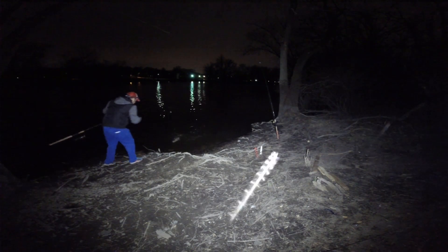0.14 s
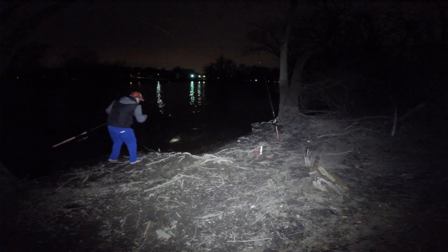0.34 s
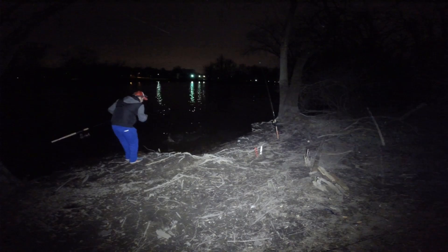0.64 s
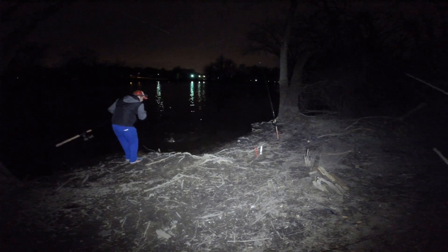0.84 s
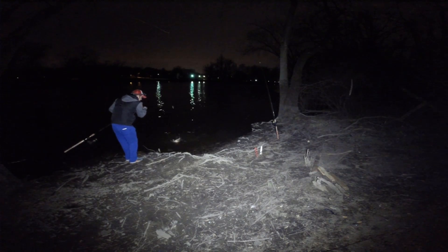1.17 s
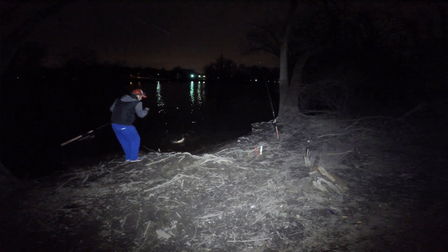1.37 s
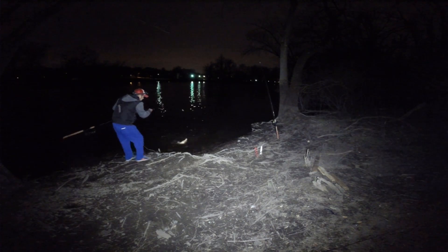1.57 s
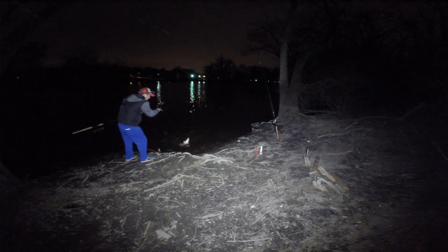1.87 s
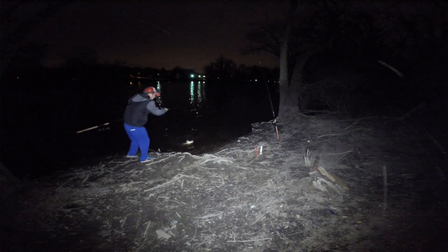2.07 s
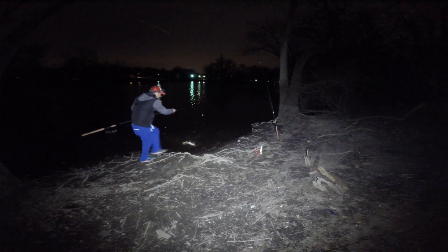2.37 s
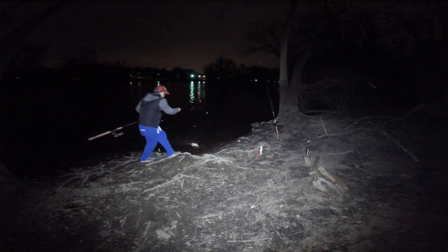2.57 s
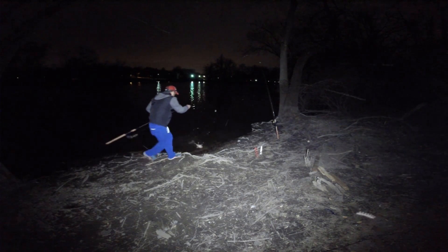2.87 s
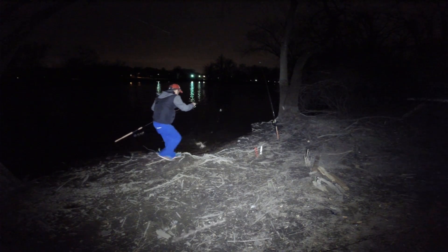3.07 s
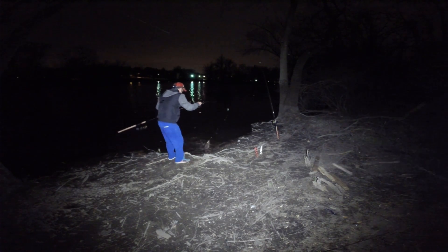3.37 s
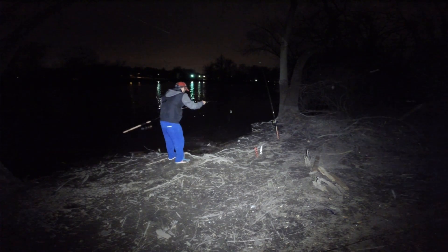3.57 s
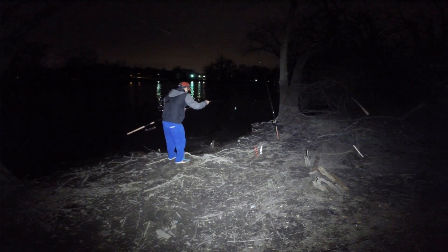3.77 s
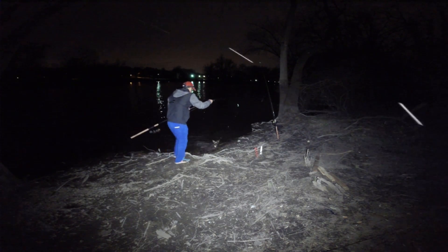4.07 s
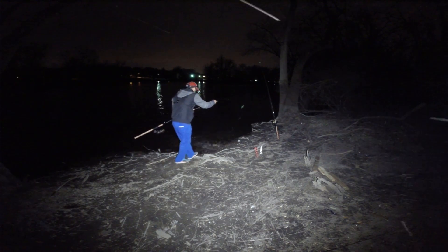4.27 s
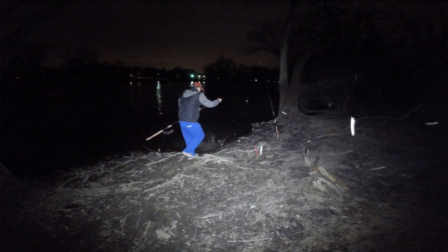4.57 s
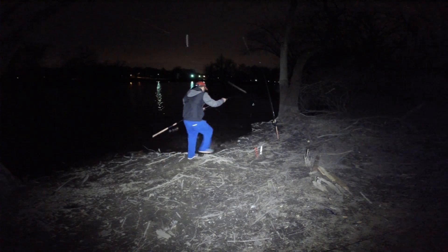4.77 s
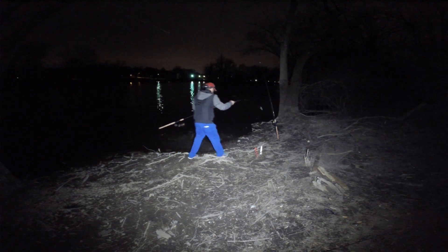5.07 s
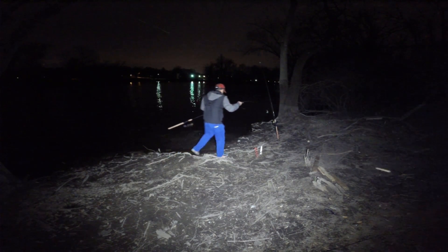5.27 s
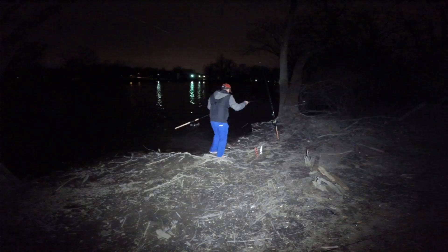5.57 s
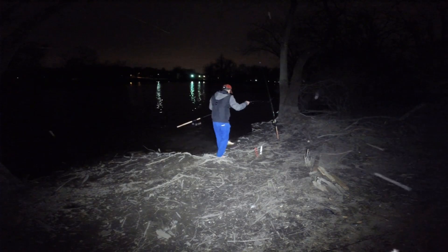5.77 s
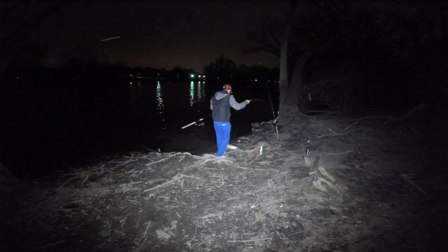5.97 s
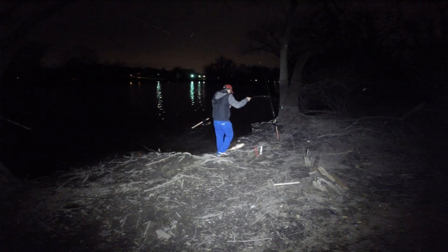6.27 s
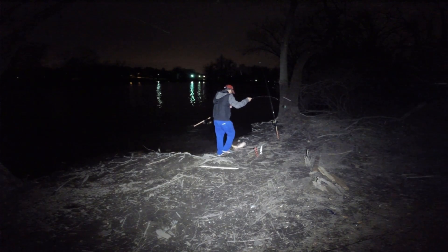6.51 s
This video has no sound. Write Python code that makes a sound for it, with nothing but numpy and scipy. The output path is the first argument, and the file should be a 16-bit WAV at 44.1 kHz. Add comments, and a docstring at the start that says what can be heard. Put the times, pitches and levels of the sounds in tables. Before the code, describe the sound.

Slow steps over dry brush at night, twigs snapping and sticks knocking while small metal tackle jingles over a faint distant drone.

```python
"""A river bank at night: a steady distant drone, soft hiss, faint hum and a thin pulsing electronic whine.
Someone starts to step slowly over dry brush: twigs tap, shoes shuffle on soil, and a small metal piece
of fishing tackle jingles with each move. Twigs snap and the litter crunches; from about 2.7 s sticks
knock underfoot too. The steps are loudest from 4 to 5.3 s, and a last one sets the tackle rattling."""
import sys
import numpy as np
from scipy import signal
from scipy.io import wavfile
from scipy.ndimage import uniform_filter1d

SR = 44100
rng = np.random.default_rng(int(sys.argv[2]) if len(sys.argv) > 2 else 0)


def transcribe(u):
    """Save the signal u as a 16-bit wav file named by the first command-line argument.

    u: samples, shape (n,) or (channels, n), limited to [-1, 1]; the rate is SR.
    q: integer samples, one column per channel.
    """
    v = np.clip(np.atleast_2d(u).T, -1, 1)
    q = np.round(v * 32767).astype(np.int16)
    wavfile.write(sys.argv[1], SR, q)


N = 292824
T = np.arange(N) / SR

# bright crack of breaking wood: (frequency [Hz], level [dB])
CRACK_EQ = [(2500, -42), (3600, -3.5), (4300, 5.5), (5600, 9), (7400, -5.5), (8700, 1), (10500, 2.5),
            (12500, -11), (15000, -24)]
# duller woody body under the crack: (frequency [Hz], level [dB])
BODY_EQ = [(300, -34), (700, 1), (1000, 10), (1400, 1), (1900, 7.5), (2500, 1.5), (3200, -12.5),
           (5000, -79)]
# metal rubbing on metal: (frequency [Hz], level [dB])
CHATTER_EQ = [(3200, -19.5), (3700, -6), (4000, 8), (4600, 6), (5100, 6), (5700, -8.5), (6500, -5.5),
              (7400, -22), (8400, -8), (9400, -16), (10000, -7), (10700, -17), (12000, -17), (15000, -29)]


def gain_of(db):
    """Decibels to a gain factor."""
    return 10 ** (np.asarray(db) / 20)


def unit_rms(x):
    """Scales a signal to rms 1."""
    return x / np.sqrt(np.mean(x ** 2) + 1e-20)


def add(mix, start, sound):
    """Mixes a sound in at a start time in seconds."""
    part = mix[max(round(start * SR), 0):][:len(sound)]
    part += sound[:len(part)]


def excite(x, response):
    """Plays a signal through an impulse response scaled to unit energy."""
    return signal.oaconvolve(x, response / np.linalg.norm(response))[:len(x)]


def colour(x, eq, size=4096):
    """Minimum-phase EQ of unit energy that follows a (Hz, dB) curve."""
    hz, db = np.transpose(eq)
    bin_hz = abs(np.fft.fftfreq(size, 1 / SR)) + 1
    log_gain = np.log(gain_of(np.interp(np.log(bin_hz), np.log(hz), db)))
    spectrum = np.exp(np.conj(signal.hilbert(log_gain)))
    return excite(x, np.fft.ifft(spectrum).real[:size // 2])


def grains(per_s, spread_db, count=N):
    """Random clicks of rms 1, most small and a few large."""
    size = gain_of(spread_db * np.minimum(rng.exponential(1, count), 4))
    return unit_rms(size * rng.choice([-1, 1], count) * (rng.random(count) < per_s / SR))


def flutter(smooth_samples, count=N):
    """Random modulation of rms 1."""
    return unit_rms(uniform_filter1d(rng.standard_normal(count), size=smooth_samples))


def ring(hz, db, t60, t):
    """One mode, dying by 60 dB in t60 seconds."""
    return gain_of(db - 60 * t / max(t60, 1e-3)) * np.sin(2 * np.pi * hz * t)


def night(drone_db=-49, hiss_db=-64, hum_db=-67, hum_hz=60, first_hiss_db=-69, first_hiss_ends_s=0.41):
    """The bed: a distant drone with a hollow peak, a low hum, and soft hiss, a little brighter at first."""
    # distant drone: (frequency [Hz], level [dB])
    drone_eq = [(20, -5), (40, -4.5), (65, 4.5), (110, 1.5), (170, -0.5), (300, -2), (440, -5), (560, -0.5),
                (655, 4), (790, -7), (930, -10.5), (1100, -20), (1350, -47)]
    # steady hiss: (frequency [Hz], level [dB])
    hiss_eq = [(700, -6.5), (1100, 4), (1400, -1), (1900, 2), (2500, -3.5), (3200, -8.5), (4200, -9.5),
               (5200, -9.5), (7200, -16.5), (8300, -15), (10000, -16.5), (12000, -17.5), (13500, -43),
               (15000, -34)]
    # thin, bright hiss during the first 0.4 s: (frequency [Hz], level [dB])
    first_hiss_eq = [(1800, -29), (2600, 9), (3200, -12), (4100, 1), (5000, -6), (7400, -9), (8200, 1),
                     (9000, -16), (9900, 1), (10600, -7), (11400, -1), (12500, -12), (15000, -12)]
    drone = gain_of(drone_db) * colour(rng.standard_normal(N), drone_eq)
    hiss = gain_of(hiss_db) * colour(rng.standard_normal(N), hiss_eq)
    first_hiss = gain_of(first_hiss_db) * colour(rng.standard_normal(N), first_hiss_eq)
    fade_out = np.clip((first_hiss_ends_s - T) / 0.05, 0, 1)
    hum = gain_of(hum_db) * np.sqrt(2) * np.sin(2 * np.pi * hum_hz * T)
    return drone + hiss + hum + first_hiss * fade_out


def whine(chirps_per_s=23.97, first_s=0.0016, top_hz=5660, sag_hz=330, width_s=0.004, level_db=-67):
    """A camera's electronics chirp in a steady pulse, each chirp a small arch in pitch."""
    t = (((T - first_s) * chirps_per_s + 0.5) % 1 - 0.5) / chirps_per_s  # time from the nearest crest
    phase = 2 * np.pi * (top_hz * t - sag_hz * t ** 3 / (3 * (2 * width_s) ** 2))
    swell = np.exp(-0.5 * (t / width_s) ** 2)
    octave = gain_of(-4) * swell * np.sin(2 * phase)
    return gain_of(level_db) * swell * (np.sin(phase) + octave)


def twig_taps(t60=0.022, overtone_ratio=1.38, overtone_db=-9, attack_s=0.0013, grit=0.27):
    """Thin twigs tap each other and ring briefly at their own pitch, roughened by their bark."""
    # twig on twig: (time [s], level [dB], pitch [Hz])
    taps = [(0.324, -40.5, 1050), (0.398, -41.5, 1930), (0.5853, -37, 920), (1.094, -45.5, 1820),
            (1.2993, -32, 830), (1.3874, -39, 870), (1.4656, -44, 910), (1.5294, -39, 890),
            (2.142, -32, 880), (2.5202, -38.5, 1220), (2.6184, -41.5, 1250), (3.0884, -37, 1250),
            (3.5633, -38, 907), (3.7843, -43, 1070), (3.932, -34, 995), (3.9719, -34.5, 1620),
            (4.017, -27, 1466), (4.3997, -34.5, 1110), (4.4338, -34, 900), (4.671, -43, 1570),
            (4.8678, -18, 946), (5.001, -29, 1000), (5.3102, -21.5, 970)]
    out, t = np.zeros(N), np.arange(SR // 12) / SR
    for start, db, hz in taps:
        tap = ring(hz, db, t60, t) + ring(hz * overtone_ratio, db + overtone_db, t60 / 2, t)
        bark = 1 + grit * flutter(40, len(t))
        add(out, start, tap * bark * (1 - np.exp(-t / attack_s)))
    return out


def soil_shuffles(grains_per_s=900):
    """Dull bumps of soil and buried twigs while a shoe shifts."""
    # shifts of a shoe: (centre time [s], half length [s], level [dB])
    shuffles = [(0.4, 0.029, -47.5), (0.499, 0.022, -50), (0.607, 0.026, -46), (1.316, 0.059, -52),
                (1.46, 0.095, -53), (2.116, 0.023, -53), (3.516, 0.12, -52), (3.982, 0.013, -42),
                (4.47, 0.069, -46), (5.313, 0.007, -33), (6.522, 0.08, -52.5)]
    # muffled tone of the soil: (frequency [Hz], level [dB])
    soil_eq = [(100, -13.5), (200, 2.5), (320, -11), (430, 1.5), (620, 6.5), (800, 1), (1050, -19),
               (1400, -14.5), (1900, -24), (3000, -45)]
    weight = sum(gain_of(db) * np.exp(-((T - centre) / half) ** 2) for centre, half, db in shuffles)
    return colour(weight * grains(grains_per_s, spread_db=3), soil_eq)


def tackle_shaking(attack_s=0.0045, release_s=0.031, swing_db=2.5):
    """Each move of the body shakes the tackle: envelopes for its free parts and its pressed parts."""
    # moves: (time [s], hold [s], level [dB], pressed parts relative to free [dB])
    shakes = [(0.423, .09, -62.5, -9), (0.806, .04, -60, -8), (0.95, 0.018, -65, -11),
              (1.098, 0.11, -66.5, -4.5), (1.27, 0.29, -60.5, -5.5), (1.643, 0.045, -56.5, -17),
              (1.745, 0.14, -71, -8), (2.407, .05, -64, -15), (2.55, 0.29, -67, -7),
              (3.097, 0.028, -56.5, -18), (3.214, 0.068, -61.5, -4.5), (3.344, 0.45, -65, -6.5),
              (3.767, 0.17, -60, -4), (3.926, 0.093, -53.5, -14), (4.076, 0.048, -53, -14),
              (4.175, .11, -53.5, -11), (4.338, 0.2, -51.5, -3), (4.578, 0.29, -59.5, -0.5),
              (4.825, 0.11, -58, 0), (4.951, 0.048, -49, -4), (5.037, 0.38, -56.5, -2.5),
              (5.45, 0.17, -64, -0.5), (5.679, 0.027, -54.5, -6), (5.76, 0.083, -66, -4),
              (5.892, .19, -61.5, -1), (6.129, 0.12, -56.5, 1.5), (6.223, 0.34, -53.5, -3.5),
              (6.551, .11, -58.5, -1.5)]
    free, pressed = np.zeros(N), np.zeros(N)
    for start, hold, db, pressed_db in shakes:
        t = np.arange(0, hold + 6 * release_s, 1 / SR)
        attack = np.minimum(t / attack_s, 1)
        release = np.exp(-np.maximum(t - hold, 0) / release_s)
        force = gain_of(db) * attack * release
        add(free, start, force)
        add(pressed, start, gain_of(pressed_db) * force)
    # the parts swing together and apart unevenly
    swing = unit_rms(gain_of(swing_db * np.clip(flutter(1100), -2, 1)))
    return free * swing, pressed * swing


def tackle_strike(hz, t, attack_s=0.0019, choke_s=0.03, detune=0.0049, spread_db=2):
    """One hit on the tackle: where it lands sets the mix of modes, and the next touch chokes it."""
    # modes of the metal: (pitch ratio, level [dB], t60 [s])
    modes = [(1.001, -5, 0.071), (1.032, -15, 0.021), (1.14, -32, 0.0068), (1.23, -7, 0.0045),
             (2.26, -24, 0.015), (2.64, -24, 0.026)]
    tone = np.zeros(len(t))
    for ratio, db, t60 in modes:
        pitch_draw, level_draw = rng.standard_normal(2)
        tone += ring(hz * ratio * (1 + detune * pitch_draw), db + spread_db * level_draw, t60, t)
    return tone * (1 - np.exp(-t / attack_s)) * np.exp(-(t / choke_s) ** 4)


def tackle_rattle(free, pressed, pitch_hz=4077, detune=0.018, ring_db=-4, chatter_db=-2, clump_db=4.5):
    """The tackle keeps shaking with the body: free parts ring, pressed ones chatter in clumps."""
    ringing, t = np.zeros(N), np.arange(SR // 8) / SR
    pitches = pitch_hz * (1 + detune * np.linspace(-1, 1, 6))
    for hz in pitches:
        tone = tackle_strike(hz, t)
        ringing += excite(free * grains(per_s=25, spread_db=3), tone)
    clumps = unit_rms(gain_of(clump_db * flutter(500)))
    chatter = colour(pressed * clumps * grains(per_s=1000, spread_db=1.2), CHATTER_EQ)
    return gain_of(ring_db) * ringing / np.sqrt(len(pitches)) + gain_of(chatter_db) * chatter


def tackle_tinkle(free, level_db=-49.5, growth=0.44, attack_s=0.00051):
    """Light touches wake only the tackle's highest modes."""
    # top modes of the metal: (frequency [Hz], level [dB], t60 [s])
    high_modes = [(9210, -7, 0.058), (9340, -5, 0.016), (9640, -8.5, .035), (10500, -10.5, 0.027),
                  (10800, -5, 0.031)]
    out, t = np.zeros(N), np.arange(SR // 8) / SR
    force = gain_of(level_db) * free ** growth  # compressed, so gentle moves still sparkle
    for hz, db, t60 in high_modes:
        tone = ring(hz, 0, t60, t) * (1 - np.exp(-t / attack_s))
        out += gain_of(db) * excite(force * grains(per_s=20, spread_db=2), tone)
    return out


def tackle_clinks(ring_db=-2, skid_db=-10, skid_s=0.0049):
    """A loose metal part strikes and skids for a moment."""
    # accents above the rattle: (time [s], level [dB], pitch [Hz])
    clinks = [(0.4885, -43.5, 4130), (0.5824, -52, 4180), (0.837, -50, 4200), (1.0237, -48.5, 4120),
              (1.1435, -47, 4060), (1.3096, -42.5, 4200), (1.443, -45, 4110), (1.6766, -42.5, 4100),
              (2.571, -48, 4130), (2.796, -50.5, 4100), (3.1127, -46.5, 4120), (3.2336, -39.5, 3980),
              (3.5964, -46.5, 4070), (3.9884, -38.5, 4080), (4.082, -39.5, 4150), (4.3597, -40, 4270),
              (4.454, -35.5, 4070), (4.499, -35.5, 3920), (4.706, -40, 4170), (4.8354, -39, 4160),
              (4.9063, -33.5, 4060), (4.9782, -34, 3930), (5.051, -39.5, 4180), (5.1177, -41.5, 4100),
              (5.397, -50, 4130), (5.5183, -45, 4100), (5.8157, -41.5, 4000), (5.9442, -44, 4020),
              (6.008, -53, 4160), (6.242, -35, 4050), (6.3588, -32, 4130), (6.3964, -35.5, 4030),
              (6.48, -35.5, 4130)]
    out, t = np.zeros(N), np.arange(SR // 8) / SR
    for start, db, hz in clinks:
        contacts = grains(per_s=4900, spread_db=1.1, count=len(t))
        skid = colour(contacts, CHATTER_EQ) * np.exp(-t / skid_s)
        add(out, start, gain_of(db + ring_db) * tackle_strike(hz, t) + gain_of(db + skid_db) * skid)
    return out


def twig_snaps(crack_trim_db=-5, fibres_per_s=9000, lag_s=0.0008):
    """A twig breaks as a quick run of tearing fibres: a bright crack and a duller woody burst."""
    # breaks: (time [s], crack level [dB], body level [dB], decay [s])
    snaps = [(0.587, -76, -52.5, 0.003), (1.307, -62, -55, 0.002), (2.409, -57, -65, 0.0029),
             (2.519, -68, -51.5, 0.0035), (3.44, -58, -54.5, 0.0035), (3.566, -52, -64, 0.0019),
             (3.619, -52, -61, 0.0021), (3.7135, -50.5, -71, 0.0017), (3.881, -53, -70, 0.002),
             (4.03, -40, -43.5, 0.0026), (4.494, -46, -52, 0.0024), (4.5145, -54, -49, 0.0024),
             (4.5158, -33, -41, 0.0022), (4.579, -41, -52, 0.0038), (4.768, -53, -60, 0.0024),
             (4.841, -45, -44.5, 0.0017), (4.8594, -46, -38, 0.0019), (4.8617, -39.5, -42, 0.0015),
             (4.8671, -42, -31.5, 0.0019), (4.892, -42, -57, 0.0022), (4.97, -46, -53, 0.0028),
             (4.999, -35, -43.5, 0.0031), (5.053, -44, -55, 0.0024), (5.3074, -38.5, -38, 0.005),
             (6.188, -42.5, -40.5, 0.0022), (6.242, -50, -60, 0.0028), (6.288, -44, -64, 0.0018)]
    crack, body, t = np.zeros(N), np.zeros(N), np.arange(SR // 25) / SR
    for start, crack_db, body_db, decay in snaps:
        fade = np.exp(-t / decay)
        fade_rms = np.sqrt(np.mean(fade ** 2))
        for layer, db in (crack, crack_db + crack_trim_db), (body, body_db):
            fibres = grains(fibres_per_s, spread_db=3, count=len(t))
            burst = unit_rms(fade * fibres) * fade_rms
            add(layer, start + lag_s, 2 * gain_of(db) * burst)
    return colour(crack, CRACK_EQ) + colour(body, BODY_EQ)


def litter_crunch(body_trim_db=-3):
    """Countless tiny breaks in the litter while weight is on it, loudest where the sole scrapes."""
    # sole on brush: (centre time [s], half length [s], crackle level [dB], body level [dB])
    scrapes = [(1.24, 0.051, -75, -63), (1.322, 0.017, -71, -55), (3.46, .2, -76, -71),
               (3.692, 0.015, -68, -60), (4.263, 0.025, -55.5, -52), (4.352, 0.012, -62, -65),
               (4.48, 0.34, -66, -58), (4.518, 0.022, -56, -43), (4.861, 0.016, -55, -48),
               (4.905, .015, -66, -52), (5.002, 0.0078, -61, -40), (5.02, 0.18, -67, -60),
               (5.062, .008, -61, -60), (6.129, 0.0046, -61, -56), (6.193, 0.005, -59, -41),
               (6.38, 0.27, -76, -61)]
    crackle_envelope, body_envelope = np.zeros(N), np.zeros(N)
    for centre, half, crackle_db, body_db in scrapes:
        stroke = np.exp(-((T - centre) / half) ** 2)
        crackle_envelope += gain_of(crackle_db) * stroke
        body_envelope += gain_of(body_db + body_trim_db) * stroke
    crackle = colour(crackle_envelope * grains(per_s=1400, spread_db=4), CRACK_EQ)
    body = colour(body_envelope * grains(per_s=500, spread_db=4), BODY_EQ)
    return crackle + body


def stick_knocks(bend_hz=1920, bend_t60=0.0051, bend_lag_s=0.00036):
    """Sticks knock on the ground: each blow swells as the shoe loads it, and the soil soon damps it."""
    # blows: (time [s], peak [dB], pitch [Hz], attack [s], base t60 [s], bend relative to peak [dB])
    knocks = [(2.734, -38, 675, 0.0011, 0.017, -15), (3.285, -36, 570, 0.0037, 0.086, -20),
              (3.443, -35, 565, 0.00082, 0.043, -21), (3.505, -35.5, 610, .001, 0.032, -28),
              (3.532, -36.5, 590, 0.0016, 0.022, -13), (3.987, -21.5, 593, .008, 0.023, -36),
              (4.000, -31.5, 653, 0.0015, 0.04, -32), (4.031, -25.5, 603, 0.00057, 0.032, -23),
              (4.402, -36, 670, 0.00085, 0.022, -20), (4.4385, -33.5, 690, 0.00045, 0.048, -16),
              (4.457, -38, 573, 0.0022, 0.061, -30), (4.472, -35, 534, .002, 0.017, -26),
              (4.485, -29, 578, 0.004, .035, -28), (4.500, -28, 586, 0.0015, 0.022, -22),
              (4.517, -23, 671, 0.00018, 0.059, -14), (4.522, -45, 755, 0.0014, 0.031, -12),
              (4.847, -30.5, 593, 0.00059, .02, -4), (4.859, -29.5, 586, 0.00057, 0.015, -15),
              (4.868, -22, 674, 0.00088, 0.029, -16), (4.999, -18, 585, 0.00043, 0.016, -12.5),
              (5.0045, -19.5, 662, 0.0013, 0.024, -33), (5.3102, -11.5, 678, 0.00093, 0.015, -24.5),
              (6.1902, -18, 587, 0.0026, 0.01, -7)]
    # modes of a stick: (pitch ratio, level [dB], t60 ratio)
    modes = [(1, 10.5, 0.83), (.32, -16, 0.4), (.68, -12.5, 0.92), (1.32, -10, 0.5), (1.62, -30, 0.33)]
    out, t = np.zeros(N), np.arange(SR // 10) / SR
    bend = ring(bend_hz, 0, bend_t60, t) * t  # the stick flexes as well, higher and more briefly
    for start, db, hz, attack, t60, bend_db in knocks:
        blow = sum(ring(hz * ratio, mode_db, t60 * life, t) for ratio, mode_db, life in modes)
        blow *= (1 - np.exp(-t / attack)) ** 2
        add(out, start, gain_of(db) * blow / abs(blow).max())
        add(out, start + bend_lag_s, gain_of(db + bend_db) * bend / abs(bend).max())
    return out


def bank_scatter(x, wet_db=-13, t60=0.11, predelay_s=0.003):
    """Ground and brush scatter a short, weak tail; the open air returns nothing more."""
    t = np.arange(SR // 5) / SR
    reflections = grains(per_s=3000, spread_db=0, count=len(t))
    tail = reflections * gain_of(-60 * t / t60) * (t > predelay_s)
    return x + gain_of(wet_db) * excite(x, tail)


def scene():
    """Steps and tackle on the bank over the night bed and the whine, in mono."""
    steps = stick_knocks() + twig_snaps() + twig_taps() + litter_crunch() + soil_shuffles()
    free, pressed = tackle_shaking()
    tackle = tackle_clinks() + tackle_rattle(free, pressed) + tackle_tinkle(free)
    return (bank_scatter(steps + tackle) + night() + whine())[None]


def record(dry, cutoff_hz=15250):
    """A steep low-pass takes the very top off the mix."""
    lowpass = signal.firwin(511, cutoff_hz, window=("kaiser", 9), fs=SR)
    return signal.oaconvolve(dry, lowpass[None], "same")


dry = scene()
out = record(dry)
transcribe(out)
```